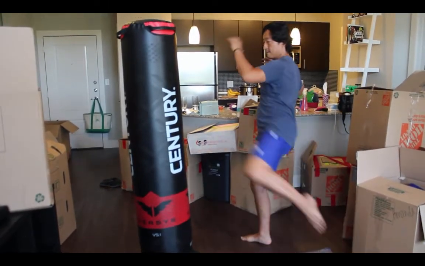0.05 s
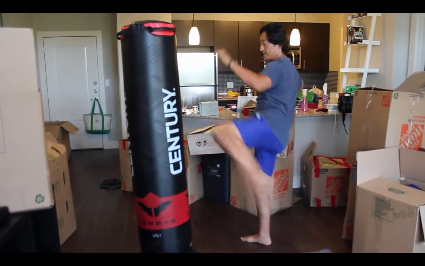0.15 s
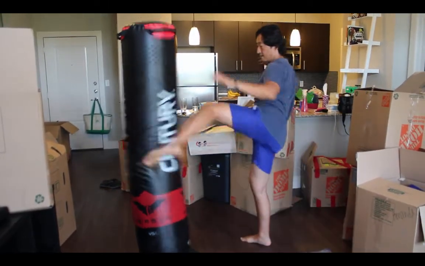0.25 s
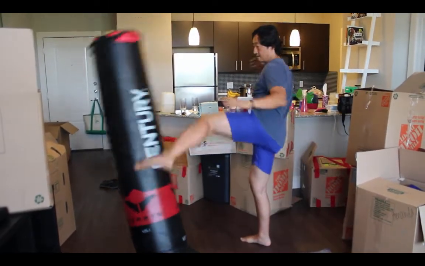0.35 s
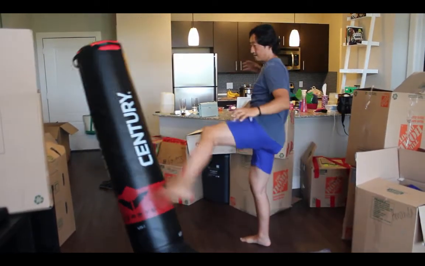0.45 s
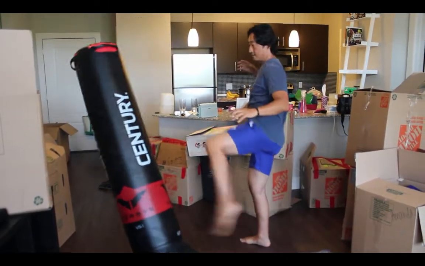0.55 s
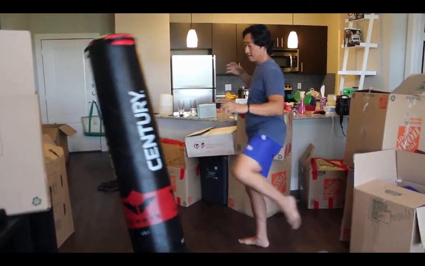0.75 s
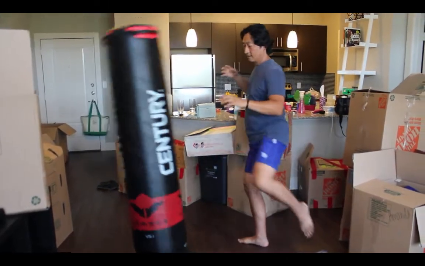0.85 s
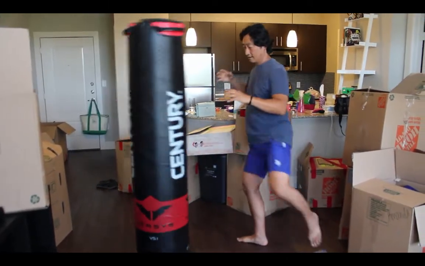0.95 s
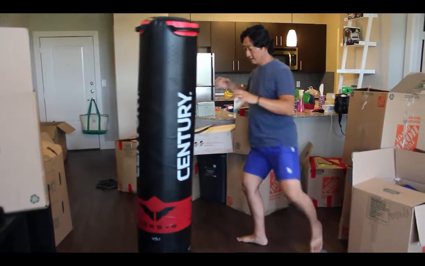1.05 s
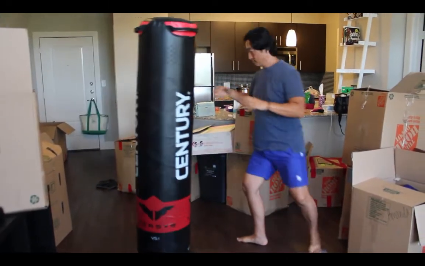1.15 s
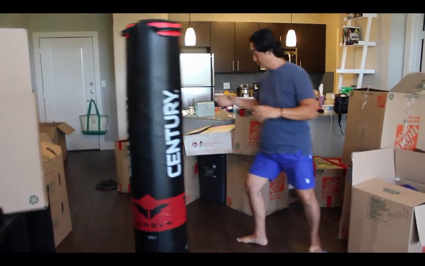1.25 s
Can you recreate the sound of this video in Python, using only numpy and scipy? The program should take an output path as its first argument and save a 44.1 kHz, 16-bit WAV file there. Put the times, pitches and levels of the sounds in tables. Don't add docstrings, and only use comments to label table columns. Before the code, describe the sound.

A bare foot smacks a heavy free-standing punching bag once, loud and sharp, in a room.

```python
import sys
import numpy as np
from scipy import signal
from scipy.io import wavfile

SR = 44100
rng = np.random.default_rng(int(sys.argv[2]) if len(sys.argv) > 2 else 0)


def voltage_ratio(level):
    return 10 ** (np.asarray(level, float) / 20)


def unload_audio(sound):
    columns = np.transpose(np.atleast_2d(sound))
    steps = np.round(np.clip(columns, -1, 1) * 32767)
    wavfile.write(sys.argv[1], SR, steps.astype(np.int16))


N = 57330

# start_s, peak level_db, brightness_db (per two octaves above 1 kHz)
SLAPS = [
    (0.249, 1.5, -6),
    (0.2494, -2, 5),
    (0.251, -5, -3),
    (0.2524, -8, 7),
    (0.2542, -9, 9),
    (0.2577, -11, 0),
    (.2603, -11, -6.5),
    (.2645, -12, -4),
]
# pitch_hz, level_db, t60_s
BAG_MODES = [(215, -14, .06), (365, -9, .045), (483, -10, 0.043), (830, -12, 0.047), (990, -11, .03),
             (1540, -12, 0.014), (2090, -6, 0.0086), (3200, -22, 0.0046), (4700, -9, .008),
             (5216, -7, .008), (5700, -8, .008)]
# freq_hz, density_db (per Hz)
CRACK_COLOUR = [(600, -14), (2000, 10.5), (3800, -16), (5200, 4.5), (6800, -9), (11000, -1), (16000, -1)]
# freq_hz, density_db (per Hz)
ROOM_COLOUR = [(45, -19), (105, -32), (160, -8), (550, -3), (1200, -8), (1700, -5.5), (2600, -12.5),
               (15500, -24.5)]
# freq_hz, t60_s
ROOM_T60 = [(50, 0.73), (120, 0.35), (400, 0.64), (1500, .7), (5000, 0.74), (14000, 0.42)]
# pitch_hz, level_db, t60_s
ROOM_MODES = [(51.4, -35, .8), (59.9, -35, .8), (150.7, -23, .4), (209.3, -18, 0.24), (272, -28, 0.68),
              (340, -21.5, 0.44), (388.6, -23, 0.62), (493, -40, 0.52), (548.6, -26.5, 0.88),
              (578.7, -25, 0.51), (581.3, -28, 0.81), (987, -25.5, 0.48), (1590, -28, 0.9),
              (1938, -29, 0.75)]
# start_s, peak level_db, pitch_hz, t60_s
KNOCKS = [
    (.915, -39, 339, .08),
    (1.045, -41, 360, .08),
    (1.131, -46, 149.6, .2),
    (1.262, -38, 300, .05),
    (1.279, -34.5, 342, 0.056),
    (1.27, -43, 131, .1),
]
# time_s, level_db
ROCKING = [(.05, -59.5), (.3, -43), (.45, -35), (.6, -49.5), (.76, -53), (.85, -43.5), (.93, -43),
           (1.02, -44), (1.13, -45.5), (1.19, -52), (1.26, -47), (1.3, -49)]
# freq_hz, density_db (per Hz)
FILL_COLOUR = [(150, -10.5), (320, -0.5), (800, -7.5), (1500, -2.5), (2600, -10.5), (5000, -15.5),
               (7500, -25.5), (13000, -32.5)]
# time_s, level_db
SWISH_LEVEL = [(.07, -67), (.13, -51), (.18, -47), (.24, -43), (.33, -36), (.41, -34), (.46, -44.5),
               (.6, -60), (.8, -61), (.92, -50), (1.04, -66), (1.2, -75)]
# freq_hz, density_db (per Hz)
SWISH_COLOUR = [(1500, -13), (5000, 4), (6800, -3), (11500, 1.5), (16000, -2)]
# freq_hz, density_db (per Hz)
BACKGROUND_COLOUR = [(25, 8), (60, -8.5), (150, -7), (330, -2.5), (600, -10), (1600, -14.5), (6000, -22.5),
                     (8000, -26), (15500, -27)]

KICK_S = SLAPS[0][0]
TIME_S = np.arange(N) / SR


def rms_one(x):
    return x / np.sqrt(np.mean(x ** 2) + 1e-20)


def at(points, x, log=False):
    a, b = np.transpose(points)
    return np.interp(np.log(x), np.log(a), b) if log else np.interp(x, a, b)


def drift(rate_hz):
    r = np.exp(-2 * np.pi * rate_hz / SR)
    wander = signal.lfilter([1], [1, -2 * r, r * r], rng.standard_normal(N + SR))
    return rms_one(wander[SR:])


def impulse(start_s):
    return (np.arange(N) == int(start_s * SR)) * 1.0


def ring(x, hz, t60_s):
    r = voltage_ratio(-60 / (t60_s * SR))
    w = 2 * np.pi * hz / SR
    return signal.lfilter([0, np.sin(w)], [1, -2 * r * np.cos(w), r * r], x + 1e-18)


def dying(start_s, t60_s, rise_s):
    age = np.maximum(TIME_S - start_s, 0)
    return (1 - np.exp(-age / rise_s)) * voltage_ratio(-60 * age / t60_s)


def bands(source, colour):
    edges = np.geomspace(25, 19000, 33)
    mids = np.sqrt(edges[1:] * edges[:-1])
    gains = voltage_ratio(at(colour, mids, log=True))
    gains = gains / np.sqrt(np.sum(gains ** 2 * np.diff(edges)) * 2 / SR)
    for k, hz in enumerate(mids):
        sos = signal.butter(2, edges[k:k + 2], "band", fs=SR, output="sos")
        twice = np.tile(source[k % 2], 2)
        yield hz, gains[k] * signal.sosfilt(sos, twice)[N:]


def coloured(source, colour):
    return sum(band for _, band in bands(source, colour))


def white():
    return rng.standard_normal((2, N))


def kick():
    scatter_db = rng.normal(0, 1.5, (len(SLAPS), len(BAG_MODES)))
    body = np.zeros(N)
    for k, (hz, mode_db, t60_s) in enumerate(BAG_MODES):
        octaves_up = max(np.log2(hz / 1000), 0)
        clicks = np.zeros(N)
        for (start_s, level_db, bright_db), own_db in zip(SLAPS, scatter_db[:, k]):
            clicks[int(start_s * SR)] = voltage_ratio(level_db + mode_db + own_db + bright_db * octaves_up / 2)
        body += ring(clicks, hz, t60_s)
    body = signal.sosfilt(signal.butter(2, 80, "high", fs=SR, output="sos"), body)

    crack_t60_s, crack_rise_s, crack_db = .006, .0001, -5
    gate = sum(voltage_ratio(level_db + bright_db) * dying(start_s, crack_t60_s, crack_rise_s)
               for start_s, level_db, bright_db in SLAPS)
    return body + voltage_ratio(crack_db) * coloured(1e-9 + gate * white(), CRACK_COLOUR)


def room():
    room_db, early_db = -11.5, 6
    early = voltage_ratio(early_db) * dying(KICK_S + .002, .055, .003)
    tail = np.zeros(N)
    for hz, band in bands(white(), ROOM_COLOUR):
        late = dying(KICK_S + .0014, at(ROOM_T60, hz, log=True), .0032)
        tail += band * (late + early)
    modes = np.zeros(N)
    for k, (hz, level_db, t60_s) in enumerate(ROOM_MODES):
        polarity = (-1) ** k
        modes += voltage_ratio(level_db) * polarity * ring(impulse(KICK_S), hz, t60_s)
    return voltage_ratio(room_db) * tail + modes


def pivot():
    start_s, pitch_hz = .1875, 1600
    chirp_db, echo_db, tick_db = -36, -41.5, -38
    colour = [(400, -22), (900, -8), (pitch_hz, 2), (2300, -7), (3100, -5), (4000, -19), (5200, -16), (7000, -30)]
    gate = voltage_ratio(chirp_db) * dying(start_s, .045, .001) + voltage_ratio(echo_db) * dying(start_s, .38, .004)
    tick = ring(impulse(start_s) * voltage_ratio(tick_db), pitch_hz, .05)
    return tick + gate * coloured(white(), colour)


def knocks():
    out = np.zeros(N)
    for start_s, level_db, hz, t60_s in KNOCKS:
        tone = 2 * np.sin(2 * np.pi * hz * (TIME_S - start_s))
        out += voltage_ratio(level_db) * dying(start_s, t60_s, .0034) * tone
    return out


def fill():
    grains_per_s = 4000
    hits = rng.random((2, N)) < grains_per_s / SR
    strength = voltage_ratio(2.7 * np.minimum(rng.exponential(1, (2, N)), 4))
    grains = hits * strength * rng.choice([-1, 1], (2, N))
    noise = rms_one(coloured(grains, FILL_COLOUR))
    return voltage_ratio(at(ROCKING, TIME_S) + .5 * drift(22)) * noise


def swish():
    colour = [(400, -40)] + SWISH_COLOUR
    noise = sum(band * voltage_ratio(.5 * drift(17)) for _, band in bands(white(), colour))
    return voltage_ratio(at(SWISH_LEVEL, TIME_S)) * noise


def scuff():
    start_s, length_s, level_db = 1.078, .055, -57
    colour = [(7000, -25), (9200, -6), (10300, -10), (12000, 2), (13500, -20)]
    gate = dying(start_s, .4, .002) * (TIME_S < start_s + length_s)
    return voltage_ratio(level_db) * gate * coloured(white(), colour)


def background():
    return voltage_ratio(-47) * coloured(white(), BACKGROUND_COLOUR)


def scene():
    return (kick() + room() + pivot() + knocks() + fill() + swish() + scuff() + background())[None]


def roll_off(x):
    return signal.sosfilt(signal.butter(12, 16430, fs=SR, output="sos"), x)


def record(dry):
    low_cut = signal.butter(2, 45.7, "high", fs=SR, output="sos")
    high_cut = signal.ellip(10, .5, 70, 15700, fs=SR, output="sos")
    heard = signal.sosfilt(np.vstack([low_cut, high_cut]), dry)
    duck_db, ducked_s, recovered_s = -7, .2514, .43
    gain = voltage_ratio(np.interp(TIME_S, [KICK_S, ducked_s, recovered_s], [0, duck_db, 0]))
    mix = np.clip(heard * gain, -.98, .98)
    return roll_off(mix)


dry = scene()
out = record(dry)
unload_audio(out)
```